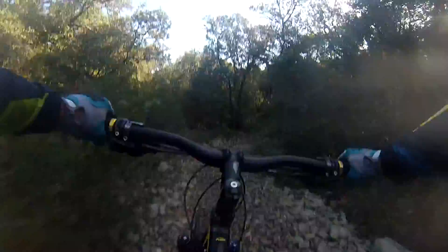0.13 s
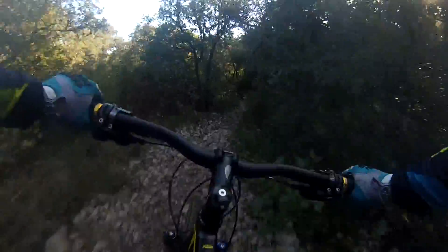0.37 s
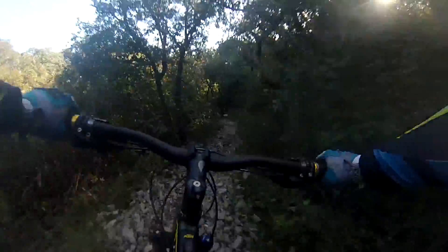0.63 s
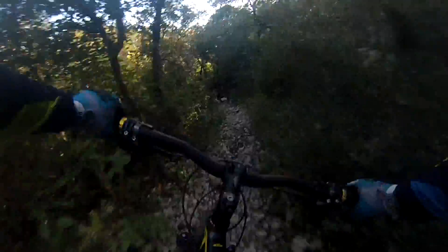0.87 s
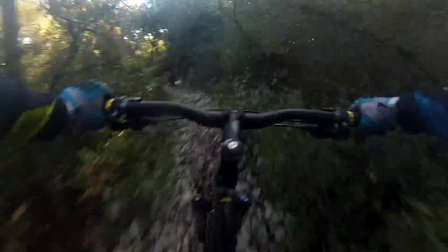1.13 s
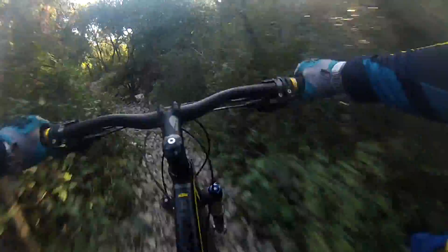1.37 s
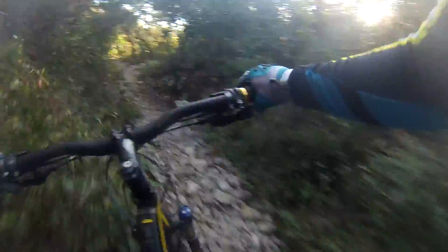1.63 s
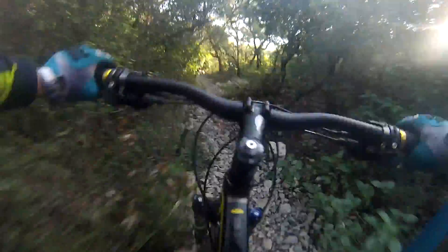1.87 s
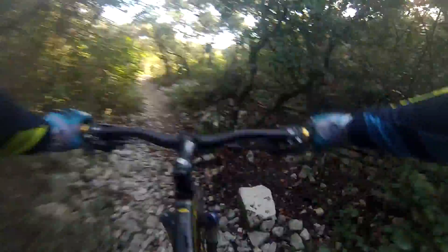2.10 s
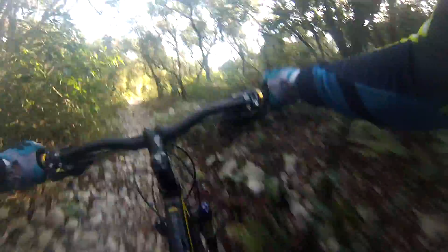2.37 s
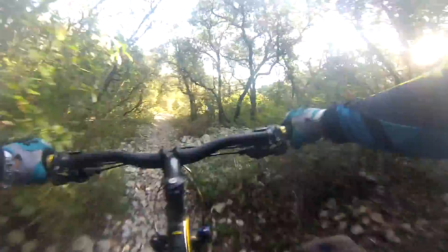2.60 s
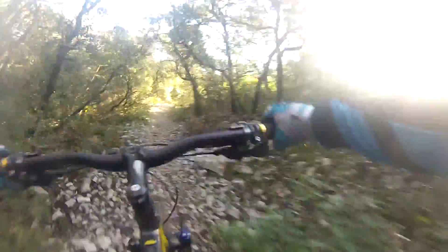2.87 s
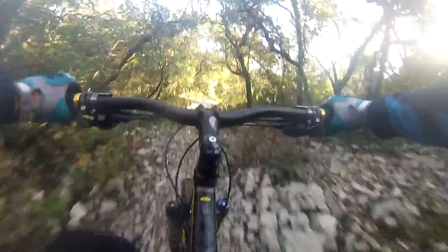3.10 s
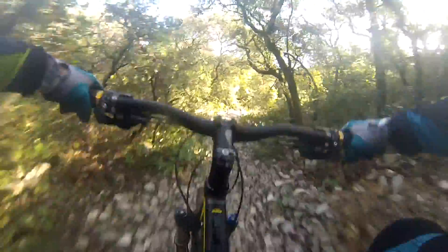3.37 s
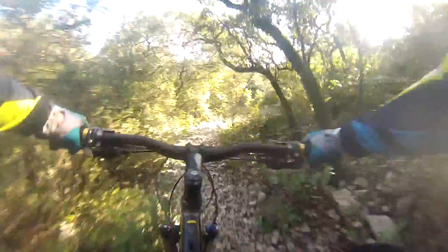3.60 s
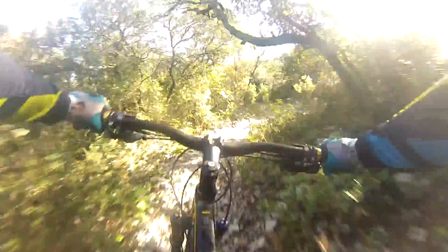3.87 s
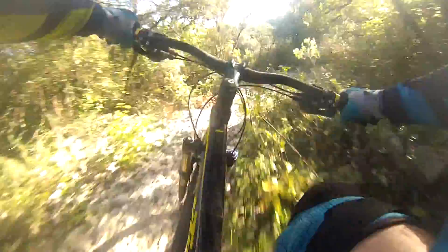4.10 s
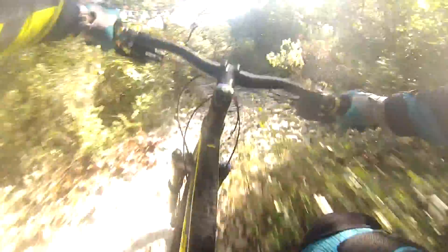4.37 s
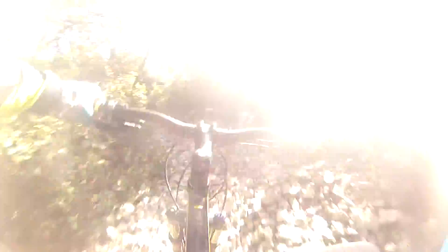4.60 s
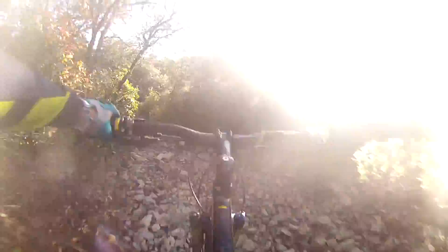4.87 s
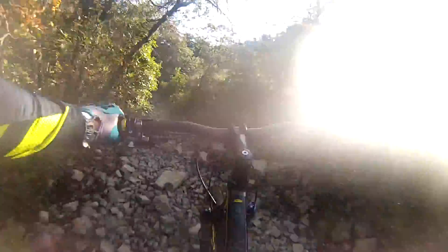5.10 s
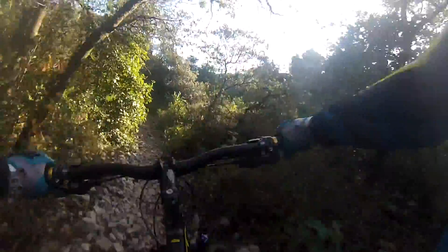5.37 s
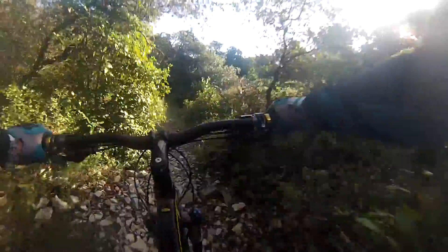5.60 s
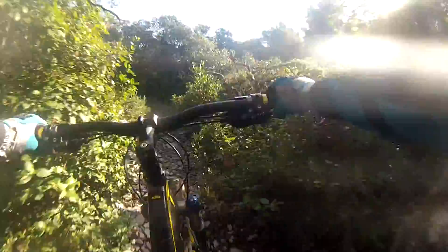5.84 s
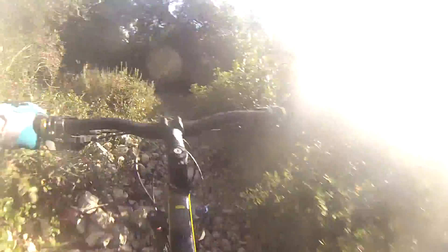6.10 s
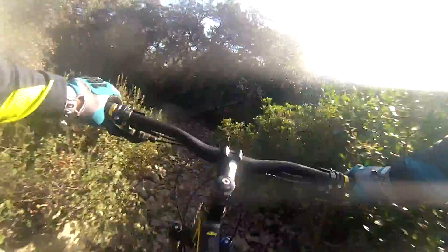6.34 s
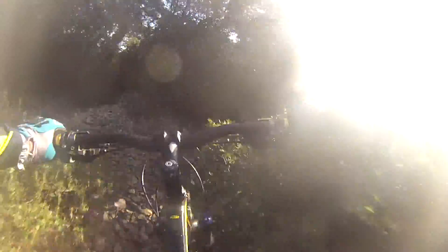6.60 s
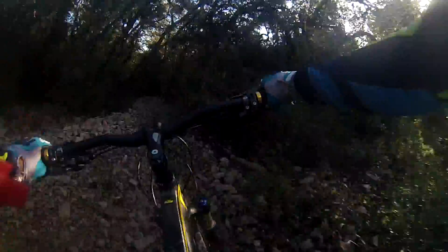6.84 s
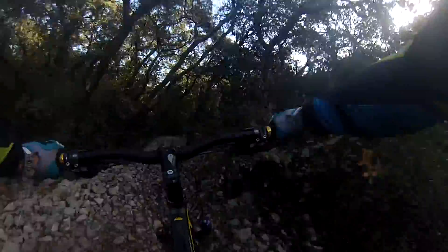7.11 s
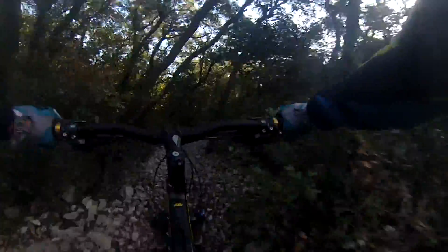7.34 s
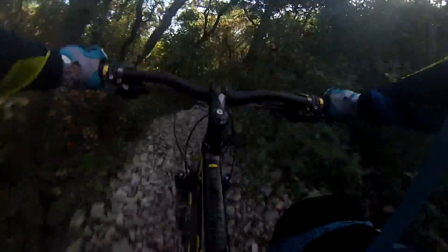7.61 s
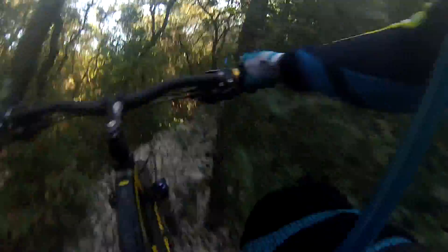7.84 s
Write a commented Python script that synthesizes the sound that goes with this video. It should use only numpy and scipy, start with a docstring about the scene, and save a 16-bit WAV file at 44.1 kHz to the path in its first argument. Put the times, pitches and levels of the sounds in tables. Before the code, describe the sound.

A bicycle descends a rocky woodland trail, heard from a microphone shut in a hard case on the rider's chest. Irregular short plastic knocks and rattles run throughout over muffled tyre crunch, stone clacks, soft low thumps and windy rumble. The hardest knock cracks just after two seconds; the ground thins near three and five, then the crunch swells strongest at the end.

```python
"""A mountain bike runs down a stony trail, heard by a camera shut in a hard case on the rider's chest.
From the start jolts knock camera against case, ringing case modes, over crunching tyres (clumped grains).
The hardest knock falls just after 2.1 s; the crunch thins near 3 s and 5 s and is loudest near 7.8 s.
Throughout, stones clack (short noise bursts), low chest swings thump (sines), and wind and body sway
rumble (shaped noise). One microphone feeds two channels and flattens the hardest knocks."""
import sys
import numpy as np
from scipy import signal
from scipy.fft import rfft, irfft
from scipy.io import wavfile

SR = 44100
rng = np.random.default_rng(int(sys.argv[2]) if len(sys.argv) > 2 else 0)


def output_pcm(signal):
    """Save a mono or channel-first signal as 16-bit PCM at the path in sys.argv[1].

    Samples are clipped to [-1, 1] before scaling.
    """
    pcm = np.clip(np.atleast_2d(signal).T, -1, 1) * 32767
    wavfile.write(sys.argv[1], SR, np.round(pcm).astype(np.int16))


def invert_db(x):
    """Field ratio 10**(x/20) for x, a level in decibels (scalar or array-like)."""
    u = np.asarray(x, float) / 20
    return 10 ** u


N = 351477

# camera against case: start_s, rattle_db, thud_db, nominal_contact_ms
KNOCK_EVENTS = [(0.092, -2.5, -11.5, 1.57), (0.1764, -12, -9.5, 0.69), (0.2332, -5.5, -16, 0.72),
                (0.24, 4, -30, 0.38), (0.2682, -4.5, -47, 0.85), (0.271, -31, -8, 4.4),
                (0.4067, -13, -21, 0.38), (0.5328, 4.5, -10, 0.49), (0.5378, 4, -40, 1.4),
                (0.542, 2.5, -21, 0.59), (0.549, -2, -38, 1), (0.688, 4, -8.5, 0.54),
                (0.9063, -36, -11.5, 0.63), (0.997, 1.5, -9.5, 0.57), (1.0297, 5.5, -10.5, 0.54),
                (1.1438, -6.5, -12, 0.6), (1.3235, 2.5, -7, 0.48), (1.5365, -2.5, -10.5, 0.51),
                (1.629, 3, -14, 0.53), (1.6763, -13, -16, 0.84), (1.735, -10, -11.5, 1.1),
                (1.8231, 7, -17.5, 0.52), (1.863, -12, -11, 0.51), (1.904, -27, -13.5, 0.37),
                (1.931, 7.5, -11.5, 0.52), (2.007, -10, -14, 0.68), (2.0254, -27, -4, 1.8),
                (2.1393, -15, -56, 0.47), (2.142, 15, -10.5, 0.61), (2.265, -36, -14.5, 2.6),
                (2.249, -19, -13.5, 1.05), (2.317, -13, -10, 1.2), (2.324, 8, -7, 0.62),
                (2.6868, -10, -12.5, 0.53), (2.8241, -6.5, -8, 0.87), (2.8795, -4, -15, 0.56),
                (2.945, -36, -13.5, 1.1), (3.0886, -5, -11.5, 1.73), (3.161, -15.5, -15, 0.66),
                (3.2784, -10, -13, 1.3), (3.458, -9.5, -13.5, 0.66), (3.634, -30, -17.5, 0.64),
                (3.745, -10, -51, 0.77), (4.2062, -10, -10.5, 0.81), (4.221, 5.5, -9, 0.49),
                (4.4869, -4, -17, 0.47), (4.668, -10, -14.5, 1.17), (4.897, -8, -41, 1.2),
                (4.9577, -5, -41, 0.39), (4.962, 4.5, -33, 0.55), (4.9625, 6.5, -42, 0.63),
                (5.0209, 3.5, -6.5, 0.49), (5.1741, -0.5, -8.5, 1.53), (5.194, 4.5, -9, 0.53),
                (5.4102, -13, -13.5, 0.49), (5.4757, -12, -12.5, 0.6), (5.4929, 4, -10, 0.57),
                (5.585, -8, -15, 1.2), (5.6011, -20, -12, 0.47), (5.6257, -13, -8, 0.75),
                (5.6355, 7, -41, 0.69), (5.641, -36, -9.5, 0.099), (5.6888, -11.5, -19, 0.53),
                (5.8969, 5.5, -12, 0.57), (5.9033, 2, -5, 0.53), (6.024, 1, -18.5, 1.54),
                (6.0344, 5.5, -9.5, 0.59), (6.0897, 4, -13.5, 0.5), (6.156, -3, -15.5, 1.45),
                (6.2194, 1.5, -9.5, 0.57), (6.33, -20, -14.5, 0.98), (6.41, -33, -7, 0.63),
                (6.4163, 4.5, -9.5, 0.5), (6.4828, -17, -11.5, 0.68), (6.553, -20, -15, 1.5),
                (6.5659, -6, -24, 0.75), (6.571, 3.5, -6.5, 0.6), (6.745, -11, -24, 0.42),
                (6.84, -10.5, -8.5, 0.67), (6.9411, -14, -11, 1.1), (7.0928, -8.5, -12, 0.53),
                (7.2299, -7, -9, 1.05), (7.2445, 5.5, -9, 0.55), (7.2943, -14.5, -13, 0.57),
                (7.467, -8.5, -9, 0.71), (7.488, 0.5, -9.5, 0.59), (7.73, -4.5, -11.5, 0.73),
                (7.738, -1, -12, 0.71), (7.9411, -11.5, -15, 0.7)]
# ringing modes, the first two of the mount under the case: nominal_pitch_hz, level_db, t60_s, signed_gain
CASE_MODES = [(169, 4, 0.039, 0.4), (688, -13.5, 0.12, 0.176), (1477, -7.5, 0.012, -1.106),
              (635, -21.5, 0.026, 0.38), (713, -27.5, 0.09, -0.048), (1236, -16.5, 0.02, -0.77),
              (2040, 1.5, .0135, -1), (2200, -1.5, .013, 1), (2750, 2, 0.0067, 0.88),
              (3180, -3.5, 0.0021, -2.35), (4720, -9, 0.02, 1)]
# nominal waits between the three contacts of a knock: wait_s
REBOUND_WAITS_S = np.array([.001, .004])
# strengths of the three contacts: level_db
CONTACT_LEVELS_DB = (-1.5, -5.5, -12)
# low jolts through the rider's chest: start_s, envelope_peak_db, swing_hz
CHEST_JOLTS = [(0.185, -17.5, 44), (0.267, -22, 49.6), (0.527, -21.5, 65.4), (0.671, -20.5, 99.2),
               (1.816, -22.5, 104), (2.014, -16.5, 111), (2.109, -22.5, 65), (2.31, -19.5, 47.2),
               (3.088, -23, 46.3), (5.57, -15, 74.5), (5.6, -19, 91), (6.485, -18.5, 101), (6.761, -28, 68),
               (7.718, -24, 109)]
# tyres on gravel: time_s, crunch_db, fine_grit_db
GRAVEL_LEVELS = [(0.0, -37, -55), (0.51, -39, -50), (0.64, -34, -43), (0.84, -33, -45), (0.95, -34.5, -45),
                 (1.37, -36, -51.5), (1.47, -39, -49), (1.66, -39.5, -50), (1.97, -38, -55),
                 (2.11, -40.5, -63), (2.66, -44, -57), (3.04, -47, -60.5), (3.55, -44.5, -56),
                 (3.75, -42, -55), (3.91, -43.5, -49), (4.17, -43, -53.5), (4.59, -39.5, -48.5),
                 (5.01, -47.5, -60.5), (5.48, -36.5, -50.5), (5.73, -46, -62), (5.88, -43, -57),
                 (6.06, -39, -53), (6.66, -38, -50.5), (6.86, -38.5, -51), (7.04, -42, -57.5),
                 (7.6, -39.5, -53.5), (7.67, -38.5, -47), (7.7, -34.5, -44), (7.78, -32, -43),
                 (7.88, -35, -50.5), (7.97, -32.5, -40)]
# clearest stones shifting or flung: start_s, burst_db, relative_brightness_db, decay_ms, ring_hz
STONE_EVENTS = [(0.125, -31.5, -5, 15, 1470), (0.209, -25, -17, 3, 1390), (0.23, -15.5, -31, 9.5, 2270),
                (0.2295, -18, -30, 13.6, 3030), (0.246, -24, -26, 9.2, 1570), (0.2675, -18, -29, 4, 1200),
                (0.288, -29, -15, 15, 2400), (0.432, -31, -14, 7.9, 6600), (0.482, -28.5, -14.5, 16, 1280),
                (0.644, -24, -27, 5.5, 1400), (0.774, -34, 0, 22, 1570), (0.923, -26, -9, 23, 1560),
                (1.02, -32, -4, 4.5, 2000), (1.052, -33, -25, 5.6, 1500), (1.126, -37.5, -5, 25, 2600),
                (1.227, -27, -21, 14, 1570), (1.335, -32.5, -14, 6.5, 1400), (1.412, -33, -7.5, 43, 1640),
                (1.455, -29, -9.5, 62, 1410), (1.492, -26, -21, 1.3, 1660), (1.9317, -20, -9, 1.4, 1500),
                (1.936, -20, -30, 3.7, 1270), (1.973, -39, -39, 3.4, 1920), (2.068, -34, -6, 4.8, 2020),
                (2.258, -41, -6, 45, 2230), (2.479, -35, -9, 37, 2200), (2.613, -30.5, -24, 5.1, 2200),
                (2.732, -33.5, -13, 9.2, 2340), (2.834, -32.5, -18, 9.2, 1260),
                (3.078, -35, -19, 10.7, 1230), (3.503, -18, -33, 0.7, 2560), (3.521, -24.5, -27, 4.9, 1680),
                (3.61, -38, -23, 13, 1370), (3.72, -28.5, -23, 2.6, 2530), (3.683, -32, -33, 2.6, 2650),
                (3.701, -33, -29, 1.5, 2200), (3.853, -32, -35, 14, 1310), (4.897, -26.5, -33, 3.2, 1190),
                (4.99, -32, -22, 6.8, 1420), (5.008, -38, -22, 6, 2550), (4.221, -24, -24, 4.5, 1900),
                (4.385, -36, -18, 2.2, 2840), (4.4873, -26.5, -21, 3.4, 4300),
                (5.543, -26.5, -16, 3.5, 1560), (5.583, -31, -17, 14, 2640), (5.914, -31, -36, 2, 1500),
                (5.933, -29.5, -35, 11, 2420), (6.214, -27, -18, 4.6, 2530), (6.333, -32.5, -8, 13, 2600),
                (6.446, -28, -35, 9.3, 2620), (6.473, -31.5, -30, 8.9, 1560), (6.634, -29.5, -16, 30, 2200),
                (6.82, -34, -10, 19, 2150), (7.325, -33, -22, 10, 1570), (7.502, -26, -34, 4.6, 1520),
                (7.517, -29, -34, 5.1, 1260), (7.646, -21, -14, 6.8, 2320), (7.652, -24.5, -21, 14, 1460),
                (7.745, -30, -26, 50, 1600)]
# resonances of the shut case, dull band: centre_hz, width_hz, relative_level_db
CAVITY_PEAKS = [(433, 380, -14), (867, 120, -13), (1203, 135, -3.5), (1507, 161, 0.5), (2200, 570, -10.5),
                (2650, 140, -7), (2940, 266, -14.5)]
# resonances of the treble leaking in: centre_hz, width_hz, relative_level_db
LEAK_PEAKS = [(3620, 3200, -2.5), (4960, 520, 8.5), (6450, 690, -0.5), (9200, 3100, -10),
              (11800, 17000, -22)]
# wind and body sway: time_s, level_db
SWAY_LEVELS = [(0.0, -25), (0.2, -21), (0.45, -33), (0.93, -20.5), (1.2, -23), (1.53, -21), (2.1, -22.5),
               (2.4, -23), (2.95, -26.5), (3.6, -31), (4.15, -21), (4.4, -30.5), (4.85, -26), (5.6, -19.5),
               (6.25, -28.5), (6.6, -27), (7.36, -22.5), (7.64, -27.5), (7.97, -23.5)]
# rumble spectrum: frequency_hz, relative_density_db
RUMBLE_SPECTRUM = [(8, -21.5), (14, 4), (34, -9.5), (50, -32), (80, -23), (190, -31), (300, -52.5),
                   (420, -77)]


def rms_one(x):
    """Scale to unit rms."""
    return x / np.sqrt(np.mean(x ** 2) + 1e-20)


def in_time(rows):
    """Interpolate the columns of a curve, one value per sample."""
    time_s, *columns = np.transpose(rows)
    return [np.interp(np.arange(N) / SR, time_s, column) for column in columns]


def drift(corner_hz):
    """Slow chance: noise at every 40th sample through a double one-pole, spread 1."""
    r = np.exp(-2 * np.pi * corner_hz * 40 / SR)
    noise = rng.standard_normal(N // 40 + 2002)
    slow = signal.lfilter([1], [1, -2 * r, r * r], noise)[2000:]   # drop the settling
    return np.interp(np.arange(N) / 40, np.arange(len(slow)), rms_one(slow))


def ring(force, pitch_hz, t60_s):
    """Two-pole mode: a unit impulse starts a decaying sine of height 1."""
    r = invert_db(-60 / (t60_s * SR))
    w = 2 * np.pi * pitch_hz / SR
    return signal.lfilter([0, np.sin(w)], [1, -2 * r * np.cos(w), r * r], force + 1e-18)


def resonate(x, peaks, patchy_db=0):
    """Parallel resonances of alternating sign, each flickering alone; about rms 1 for white noise."""
    out, power = 0, 0
    for k, (centre_hz, width_hz, level_db) in enumerate(peaks):
        r = np.exp(-np.pi * width_hz / SR)
        flicker = invert_db(patchy_db * drift(27)) if patchy_db else 1
        zeros = [(1 - r * r) / 2, 0, -(1 - r * r) / 2]
        poles = [1, -2 * r * np.cos(2 * np.pi * centre_hz / SR), r * r]
        band = signal.lfilter(zeros, poles, flicker * x + 1e-18)
        out = out + (-1) ** k * invert_db(level_db) * band
        power += invert_db(2 * level_db) * np.pi * width_hz / SR
    return out / np.sqrt(power)


def through_case(dull, bright, patchy_db):
    """The case passes its cavity band and leaks a little treble."""
    low_pass = signal.butter(2, 4000, fs=SR, output="sos")
    high_pass = signal.butter(2, 2900, "high", fs=SR, output="sos")
    low = signal.sosfilt(low_pass, resonate(dull, CAVITY_PEAKS, patchy_db))
    high = signal.sosfilt(high_pass, resonate(bright, LEAK_PEAKS, patchy_db))
    return low - high   # opposite sign: no gap where the two bands meet


def contact(contact_ms):
    """A smooth push of unit area; a longer contact sounds duller."""
    phase = np.clip(np.arange(200) / (SR * contact_ms / 1000), 0, 1)
    push = np.sin(np.pi * phase) ** 2
    return push / push.sum()


def knocks():
    """Each blow drives all modes by three contacts a few ms apart; the strapped case retunes a little."""
    length, modes, count = 6000, len(CASE_MODES), len(KNOCK_EVENTS)
    out = np.zeros(N + length)
    spots = invert_db(2 * rng.standard_normal((count, 3, modes)))   # each contact lands on another spot
    waits = rng.random((count, 2))
    tunings = 1 + 0.028 * rng.standard_normal((count, modes))
    on_mount = np.arange(modes) < 2
    for event, spot, wait, tuning in zip(KNOCK_EVENTS, spots, waits, tunings):
        start_s, rattle_db, thud_db, contact_ms = event
        strength = invert_db(np.where(on_mount, thud_db, rattle_db))
        forces = np.zeros((modes, length))
        delays_s = np.cumsum([0, *(REBOUND_WAITS_S * (0.8 + 0.4 * wait))])
        for delay_s, level_db, stretch, gains in zip(delays_s, CONTACT_LEVELS_DB, (1.1, 1, 1.4), spot):
            at = int(delay_s * SR)
            push = contact(stretch * contact_ms)
            forces[:, at:at + 200] += np.outer(invert_db(level_db) * strength * gains, push)
        start = int(start_s * SR)
        for force, tune, (pitch_hz, level_db, t60_s, sign) in zip(forces, tuning, CASE_MODES):
            out[start:start + length] += sign * invert_db(level_db) * ring(force, pitch_hz * tune, t60_s)
    return out[:N]


def jolts():
    """A big rock throws the rider's chest: a low, soft swing of about two cycles."""
    length = 4000
    out, time_s = np.zeros(N + length), np.arange(length) / SR
    for start_s, peak_db, swing_hz in CHEST_JOLTS:
        cycles = swing_hz * time_s
        swell = cycles * np.exp(-1.3 * cycles)
        swing = swell / swell.max() * np.sin(2 * np.pi * cycles)
        start = int(start_s * SR)
        out[start:start + length] += invert_db(peak_db) * swing
    return out[:N]


def gravel(crunch_db, grit_db):
    """Dense clumped grains of uneven size under the rolling tyres."""
    grains_per_s, size_spread_db, clump_db, patch_db = 2000, 2, 5, 1.2
    sizes = invert_db(size_spread_db * np.minimum(rng.exponential(1, N), 4)) * rng.choice([-1, 1], N)
    born = rng.random(N) < grains_per_s / SR
    clumps = invert_db(clump_db * drift(80) + patch_db * drift(6))   # quick clumps, slower looser patches
    tyre_hiss = 0.37 * rng.standard_normal(N)
    grains = rms_one(rms_one(sizes * born * clumps) + tyre_hiss)
    grit = rms_one(grains + 1.3 * rng.standard_normal(N))   # fine grit is denser still
    return through_case(invert_db(crunch_db) * grains, invert_db(grit_db) * grit, patchy_db=2)


def pebbles(crunch_db):
    """Small stones at chance moments, their level following the crunch; columns as STONE_EVENTS."""
    count, over_crunch_db, bright_db, decay_ms, ring_hz = 40, 5, -17, 4, 1900   # centres of the draws
    draws = rng.random((count, 5))
    start_s = draws[:, 0] * (N - 1) / SR
    swing = 2 * draws[:, 1:] - 1
    return np.column_stack([
        start_s,
        crunch_db[(start_s * SR).astype(int)] + over_crunch_db + 3 * swing[:, 0],
        bright_db + 9 * swing[:, 1],
        decay_ms * invert_db(6 * swing[:, 2]),
        ring_hz * invert_db(3 * swing[:, 3])])


def stones(rows):
    """A scrape or clack: quick rise, rough burst, dying tail, and a ring, clearer the harder it hits."""
    length, rise_ms = 3000, 0.56
    dull, bright, rings = np.zeros((3, N + length))
    rough, time_ms = rng.standard_normal(N + length), np.arange(length) * 1000 / SR
    for start_s, level_db, bright_db, decay_ms, ring_hz in rows:
        start = int(start_s * SR)
        part = slice(start, start + length)
        dying = np.exp(-(time_ms / decay_ms) ** 2)
        burst = invert_db(level_db) * np.minimum(time_ms / rise_ms, 1) * dying * rough[part]
        dull[part] += burst
        bright[part] += invert_db(bright_db) * burst
        rings[part] += invert_db(0.14 * (level_db + 0.5)) * resonate(burst, [(ring_hz, ring_hz / 9, 0)])
    return through_case(dull[:N], bright[:N], patchy_db=4) + rings[:N]


def rumble(sway_db, crunch_db):
    """Wind and body sway shake the case in lumps; rough ground keeps the mount shuddering."""
    table_hz, density_db = np.transpose(RUMBLE_SPECTRUM)
    bins_hz = np.fft.rfftfreq(N, 1 / SR)
    colour = invert_db(np.interp(np.log(bins_hz + 1), np.log(table_hz), density_db))
    sway = rms_one(irfft(rfft(rng.standard_normal(N)) * colour, N))
    shake = rng.standard_normal(N) * invert_db(4 * drift(14))
    dull_shake = signal.lfilter([1], [1, -0.9], shake)
    mount_hz, _, mount_t60_s, _ = CASE_MODES[0]
    shudder = rms_one(ring(dull_shake, mount_hz, mount_t60_s / 2))   # constant contact damps the swing
    lumps_db = 3.2 * drift(12)
    return invert_db(sway_db + lumps_db) * sway + invert_db(crunch_db - 3.5) * shudder


def scene():
    """All sources reach the one microphone, which feeds both channels."""
    crunch_db, grit_db = in_time(GRAVEL_LEVELS)
    sway_db, = in_time(SWAY_LEVELS)
    sound = knocks() + jolts() + gravel(crunch_db, grit_db)
    sound = sound + stones([*STONE_EVENTS, *pebbles(crunch_db)])
    sound = sound + rumble(sway_db, crunch_db)
    return np.array([sound, sound])


def fall(x, seconds):
    """One-pole smoothing, gain 1 at 0 Hz."""
    r = np.exp(-1 / (seconds * SR))
    return signal.lfilter([1 - r], [1, -r], x)


def upset(x):
    """Half the channel difference: after a high positive peak offsets and gains part, then settle."""
    threshold, offset_db, offset_fall_s, offset_back_s = 0.61, 3.5, 0.011, 0.03
    gap_db, gap_fall_s = 0, 0.047
    over = np.clip(x - threshold, 0, 1) + 1e-18
    kick = fall(over, offset_fall_s)
    offset = -invert_db(offset_db) * (kick - fall(kick, offset_back_s))
    gain_gap = invert_db(gap_db) * np.sqrt(fall(over, gap_fall_s))
    return offset + gain_gap * x


def roll_off(x):
    """The treble ends steeply here."""
    return signal.sosfilt(signal.butter(12, 16340, fs=SR, output="sos"), x)


def record(dry):
    """Faint hiss; channels part on peaks; hardest knocks flatten at full scale; the very top is cut."""
    white = rng.standard_normal(N)
    x = dry + invert_db(-47.5) * signal.lfilter([0.09], [1, -1.4, 0.49], white)
    # faint steady noise of opposite sign in the two channels
    side_noise = invert_db(-78) * rng.standard_normal(N)
    x = x + [[1], [-1]] * (upset(np.clip(x[0], -1, 1)) + side_noise)
    x = x / (1 + np.abs(x) ** 16) ** (1 / 16)
    x = signal.sosfilt(signal.butter(4, 14500, fs=SR, output="sos"), x)
    mix = np.clip(x, -1, 1)
    return roll_off(mix)


dry = scene()
out = record(dry)
output_pcm(out)
```